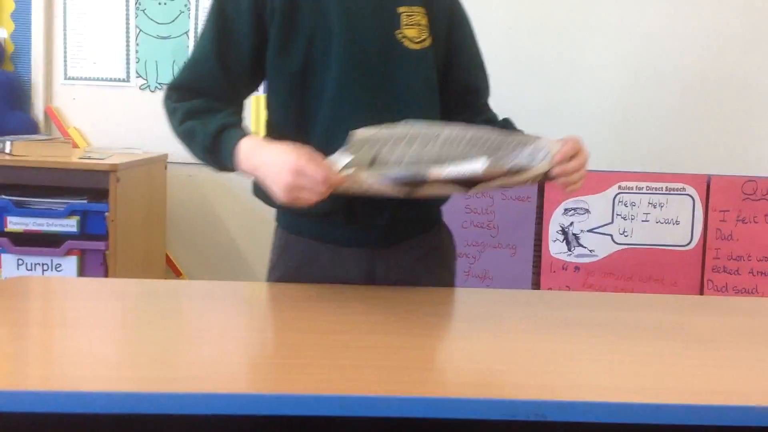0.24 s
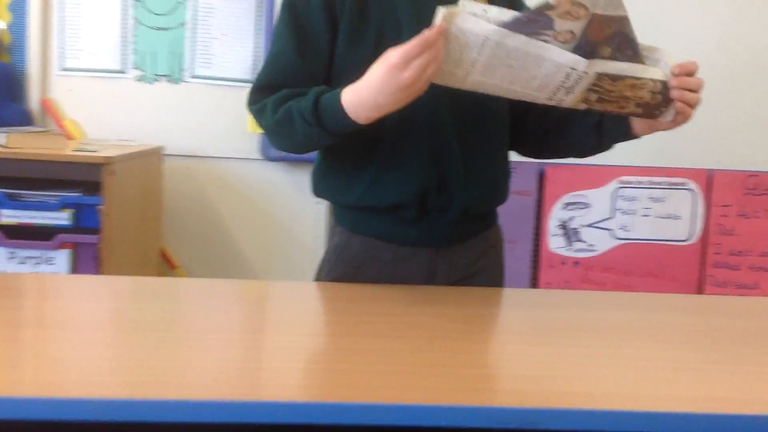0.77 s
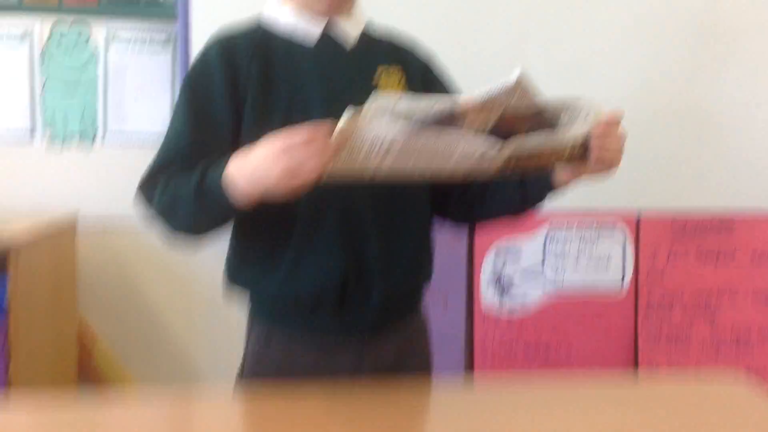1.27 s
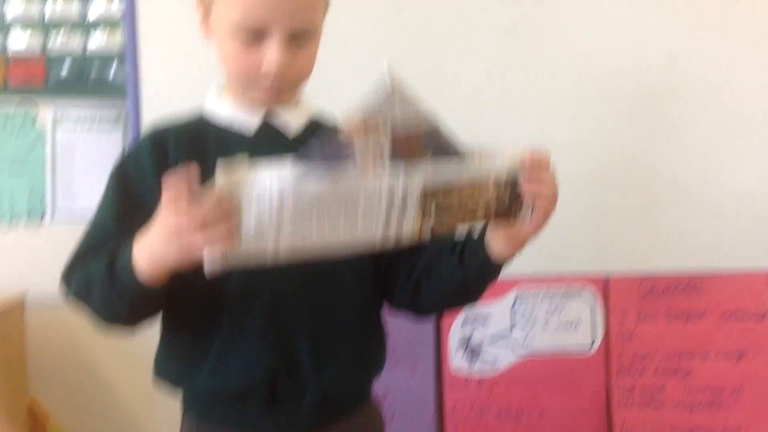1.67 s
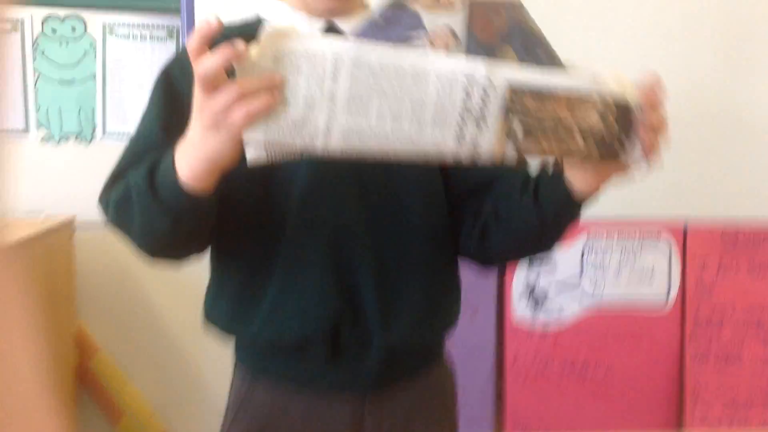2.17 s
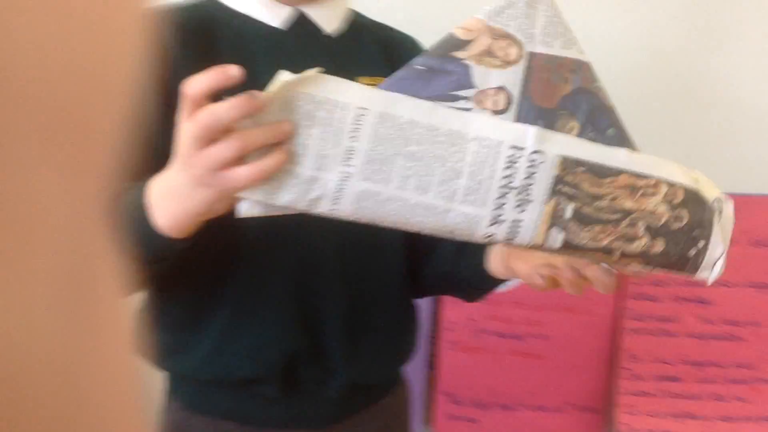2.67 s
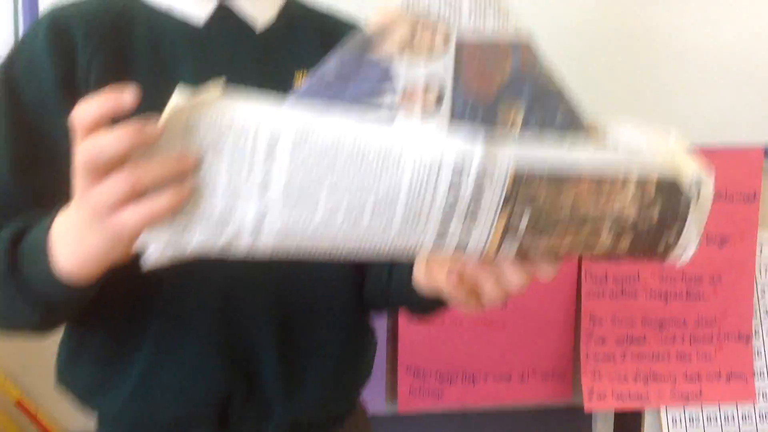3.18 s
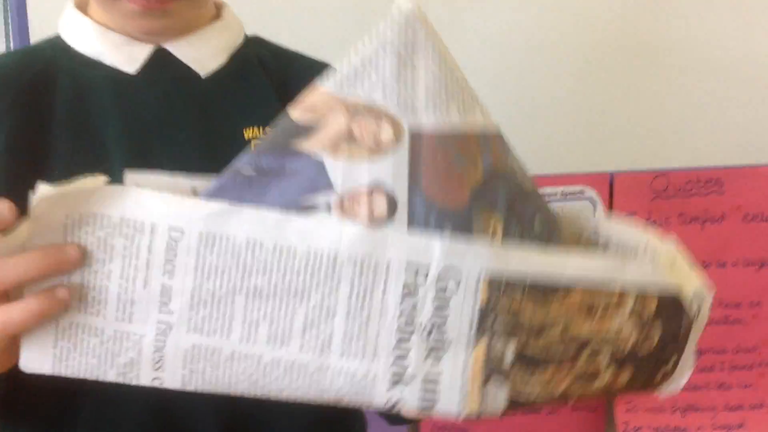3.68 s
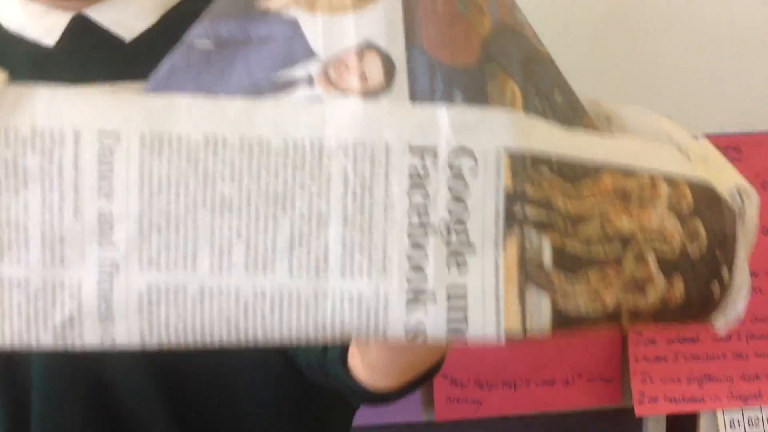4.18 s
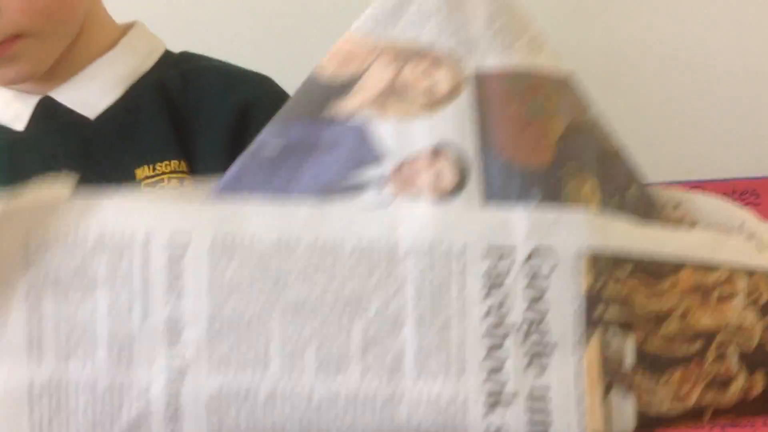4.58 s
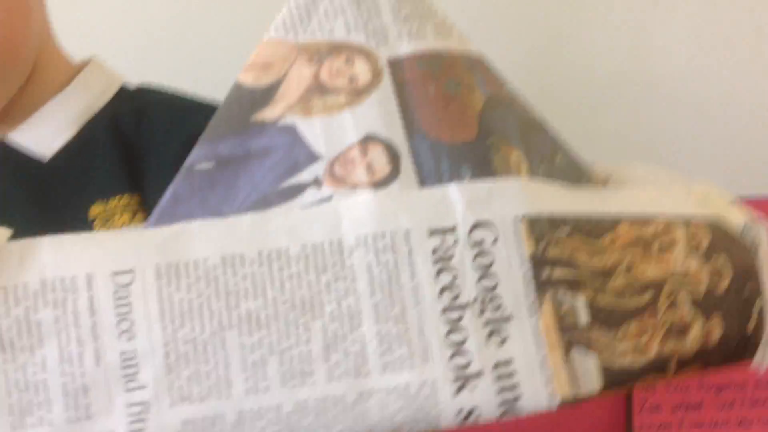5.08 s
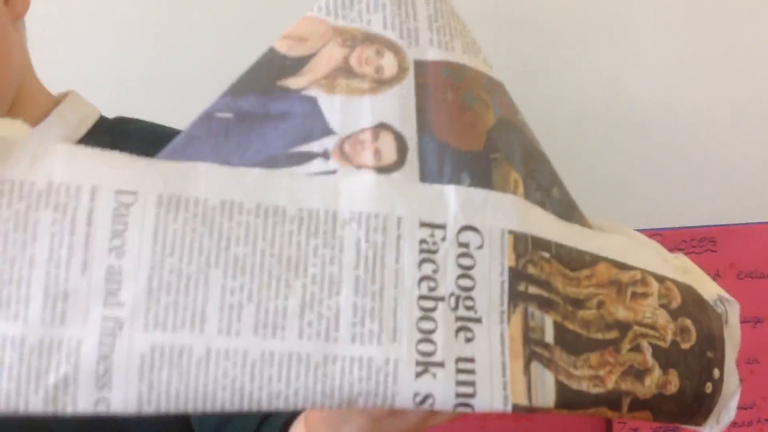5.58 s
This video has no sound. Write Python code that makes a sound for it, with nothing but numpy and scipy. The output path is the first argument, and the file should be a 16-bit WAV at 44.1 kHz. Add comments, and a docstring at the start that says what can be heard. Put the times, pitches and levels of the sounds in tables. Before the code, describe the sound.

A folded newspaper is handled close to a small hand-held microphone in a quiet, hard-walled room, over faint air hiss and a fuzzy low hum. From 0 to 1.5 s there is light, dry rustling: short swishes grainy with tiny crackles, and scattered crisp crease snaps. At about 1.6 s the camera body takes its hardest knock, a sharp tick with a short damped thump, among soft finger bumps. Rustling continues, with a bright snap near 2.5 s, then a lull until about 3.1 s. From 3.2 to 4.1 s comes the loudest flurry, dense hard snaps lasting only milliseconds, stronger swishes, and handling ticks, including a sharp click at 3.6 s. Afterwards the paper sounds duller and sparser, with small snaps near 4.5 s and a gentle swish around 4.8 s. A last cluster snaps at 5.5 s, then it fades to room tone with a barely audible bump near 5.8 s.

```python
"""Folded newspaper, turned and flexed by hand in a quiet, hard-walled room over air and a fuzzy hum.
It opens with light rustle (hiss and tiny crackles) and scattered crease snaps (ringing noise bursts).
The hand-held camera's hardest knock, a tick and a damped thump, lands near 1.6 s among soft bumps.
The loudest snaps come at 2.5 s and from 3.2 to 4.1 s, with more knocks early in that flurry.
The handling then thins out, a last cluster snaps at 5.5 s and a faint bump comes near the end."""
import sys
import numpy as np
from scipy import signal
from scipy.fft import rfft, irfft, next_fast_len
from scipy.io import wavfile
from scipy.ndimage import uniform_filter1d

SR = 44100
rng = np.random.default_rng(int(sys.argv[2]) if len(sys.argv) > 2 else 0)


def master(y):
    """Save y as 16-bit WAV."""
    cut = np.clip(np.atleast_2d(y).T, -1, 1)
    pcm = np.round(cut * 32767)  # scale
    wavfile.write(sys.argv[1], SR, pcm.astype(np.int16))


def decibels_to_gain(level_db):
    """Convert a level in decibels to a linear amplitude gain (20 dB per decade)."""
    exponent = np.asarray(level_db, float) / 20
    return 10 ** exponent


N = 257544

# Creases snapping, levels before room and shading:
# (time [s], peak level [dB], centre frequency [Hz], time to fall by e squared [ms])
CREASE_SNAPS = [(0.1343, -26.5, 6500, 5.1), (0.155, -25, 7550, 6.4), (0.268, -37, 8150, 4.0),
                (0.522, -36, 1440, 2.1), (0.716, -29, 8540, 13), (0.8046, -35.5, 4120, 6.5),
                (0.88, -34.5, 2700, 4.5), (0.9556, -31.5, 2920, 14), (1.0148, -25, 3300, 1.3),
                (1.1735, -29, 3229, 3.1), (1.3245, -26, 2860, 4.5), (1.5711, -25.5, 7700, 2.8),
                (1.6257, -25.5, 2180, 2.2), (1.6828, -25, 7200, 3), (1.849, -29.5, 2770, 5.5),
                (1.9306, -36, 3140, 4.4), (1.9704, -23.5, 5800, 8.3), (2.0116, -27, 3100, 3.1),
                (2.0337, -21, 7100, 4.2), (2.1104, -28.5, 4100, 6.9), (2.2622, -28, 7800, 9),
                (2.461, -14, 5170, 3.1), (2.5067, -23.5, 6600, 2.9), (2.799, -38, 2280, 6.8),
                (3.103, -29, 3050, 5.3), (3.222, -16.5, 5350, 7.1), (3.2693, -22.5, 3260, 11),
                (3.3038, -24, 5830, 2.5), (3.3214, -18, 3500, 3.8), (3.3963, -13.5, 4840, 1.3),
                (3.3994, -18, 4000, 4.9), (3.4345, -11, 4700, 7.9), (3.4455, -27, 3320, 4.3),
                (3.513, -9.5, 6600, 6.3), (3.654, -30.5, 3120, 14), (3.66, -29, 6400, 7),
                (3.6961, -28.5, 2730, 4.8), (3.747, -23, 5630, 4.6), (3.779, -29, 4909, 3.4),
                (3.8822, -21, 2970, 2.3), (3.8862, -9, 5600, 4), (3.9063, -16, 3700, 3.5),
                (3.916, -17.5, 3600, 11.4), (3.9488, -28.5, 2470, 2.7), (4.1109, -12, 3220, 7.1),
                (4.5398, -22, 2820, 4.2), (4.5869, -27.5, 3300, 4.2), (4.989, -38, 1290, 5.6),
                (5.4786, -27, 2930, 4.1), (5.5105, -20, 3130, 3.3), (5.5111, -28, 1330, 3.6),
                (5.5376, -26, 3600, 2.4), (5.6361, -32.5, 3370, 4)]
# Spectrum of the sliding, crackling sheet: (frequency [Hz], relative level [dB])
SHEET_SPECTRUM = [(200, -12.5), (600, -3.5), (1500, -4.5), (3000, 0), (5000, -1), (8000, 1), (11000, -4.5),
                  (15000, -5.5)]
# Swishes of sheet on sheet: (time of full level [s], level [dB], rise [s], hold [s])
SWISHES = [(0.0, -43, .011, 0.019), (0.135, -41.5, 0.037, 0.021), (0.264, -41, 0.19, .005),
           (0.393, -48.5, 0.1, .05), (0.616, -48.5, 0.036, 0.084), (0.725, -47.5, .011, 0.11),
           (0.96, -50.5, 0.0097, .05), (1.013, -38.5, 0.0041, 0.0098), (1.177, -42, .17, .011),
           (1.302, -36, 0.0096, 0.028), (1.635, -44, 0.044, 0.085), (1.802, -38, 0.084, 0.0039),
           (1.854, -52, .1, 0.016), (1.973, -46, 0.019, .04), (2.041, -40, 0.16, .005),
           (2.28, -47.5, 0.32, .005), (2.454, -39.5, 0.021, .016), (2.816, -51.5, 0.03, 0.11),
           (3.097, -43, 0.25, 0.061), (3.229, -41, .015, .009), (3.272, -38.5, .03, 0.11),
           (3.435, -30.5, 0.083, 0.0066), (3.513, -39.5, 0.058, 0.034), (3.788, -42.5, 0.34, 0.01),
           (3.88, -38.5, 0.03, 0.052), (4.103, -43, 0.035, 0.0081), (4.302, -52, 0.25, 0.0081),
           (4.412, -54.5, .06, 0.084), (4.834, -43.5, 0.28, 0.013), (5.187, -51, 0.43, 0.02),
           (5.34, -52, 0.13, .03), (5.525, -48.5, 0.042, .011), (5.626, -56, .21, .005)]
RISE_DB, FALL_DB_PER_S = 40, 166  # each swish climbs RISE_DB in its rise; all die away alike
# Steady handling under the swishes: (time [s], level [dB])
HANDLING = [(0, -50), (.6, -57.5), (.9, -55), (1.5, -51.5), (2.2, -49), (2.45, -51), (2.75, -59.5),
            (3.0, -65), (3.2, -48), (3.7, -46.5), (4.0, -50), (4.35, -59), (4.6, -56.5), (5.1, -58),
            (5.4, -76), (5.84, -87)]
# Crackle against hiss when the motion is at -41.5 dB; harder motion crackles more
CRACKLE_SHARE, CRACKLE_GROWTH = 0.69, 0.17
# Tilt of the paper's treble above 5200 Hz: (time [s], slope [dB per octave])
TREBLE_TILT = [(0, -1), (1.0, -1.5), (1.7, -2), (2.3, -3.5), (2.5, -13.5), (2.9, -8), (3.1, -20.5),
               (3.3, -21.5), (3.58, 2.5), (3.9, -22.5), (4.11, -8.5), (4.3, -26), (5.84, -28.5)]
# Decay of the hard-walled room: (frequency [Hz], time to fall 60 dB [s])
ROOM_DECAY = [(300, 0.43), (2000, 0.11), (6000, 0.3), (14000, 0.28)]
# Camera shell creaking in the grip; the thump settles at 0.8 of its nominal pitch:
# (time [s], tick peak level [dB], thump peak level [dB], nominal thump pitch [Hz])
CAMERA_KNOCKS = [(1.0493, -61, -34, 253), (1.495, -27.5, -33.5, 640), (1.6379, -1.5, 0, 563),
                 (1.6398, -14, -30, 1100), (1.651, -4.5, -24.5, 266), (1.6647, -8, -8, 378),
                 (1.8168, -20, -18, 308), (2.3388, -15, -14, 450), (3.1787, -26, -55, 1248),
                 (3.1846, -25, -54, 581), (3.1915, -31, -54, 1442), (3.34, -32, -34.5, 287),
                 (3.3594, -21, -26.5, 816), (3.3738, -40, -33, 441), (3.39, -41, -24, 1820),
                 (3.43, -29, -31, 352), (3.4409, -32, -30.5, 248), (3.5802, -19, -24, 240),
                 (3.6093, 6, -14.5, 167)]
# Soft bumps of fingers on the camera: (time [s], peak level [dB], pitch [Hz])
FINGER_BUMPS = [(1.607, -31, 514), (1.631, -22, 636), (1.659, -32, 440), (1.795, -36, 250),
                (1.811, -18, 246), (2.592, -43.5, 440), (2.924, -41.5, 402), (2.954, -42.5, 516),
                (3.2122, -25.5, 294), (3.218, -29, 148), (3.599, -26.5, 310), (5.775, -55.5, 165)]
BUMP_CYCLES, BUMP_RATTLE = 0.67, 0.52  # cycles until the swell peaks, rattle against tone
# Spectrum of room tone and microphone hiss: (frequency [Hz], relative level [dB per Hz])
AIR_SPECTRUM = [(30, -43), (90, -18.5), (180, -1), (300, -2.5), (700, -8), (1500, -12.5), (5000, -17),
                (9000, -21), (15000, -23.5), (16000, -75)]
AIR_DB = -61.5  # rms
HUM_HZ, HUM_WIDTH_HZ, HUM_DB = 210, 12, -70  # rms level


def evened(x):
    """Scales to rms 1."""
    return x / np.sqrt(np.mean(x ** 2) + 1e-20)


def peaked(x):
    """Scales to peak 1."""
    return x / abs(x).max()


def read(points, hz):
    """Reads a table on a log-frequency axis."""
    f, value = np.transpose(points)
    return np.interp(np.log(hz + 1), np.log(f + 1), value)


def colour(x, points):
    """Shapes the spectrum of x."""
    size = next_fast_len(len(x))
    gain = decibels_to_gain(read(points, np.fft.rfftfreq(size, 1 / SR)))
    return irfft(rfft(x, size) * gain, size)[:len(x)]


def resonate(x, hz, q):
    """Rings x through one resonance."""
    return signal.lfilter(*signal.iirpeak(hz, q, SR), x)


def add(mix, s, sound):
    """Mixes a sound in at s seconds."""
    part = mix[round(s * SR):][:len(sound)]
    part += sound[:len(part)]


def snaps():
    """A crease flips: a burst of micro-slips rings a patch of the sheet and dies in milliseconds."""
    out, t = np.zeros(N), np.arange(1024) / SR
    noise = rng.standard_normal((len(CREASE_SNAPS), 1024))
    for (s, db, hz, ms), slips in zip(CREASE_SNAPS, noise):
        decay = np.exp(-t / (ms / 1000 / 2))
        band = signal.butter(2, [hz / 3.5, min(2.2 * hz, 14000)], "band", fs=SR)
        wide = evened(signal.lfilter(*band, slips))
        ring = evened(resonate(slips, hz, 3.5))
        add(out, s, decibels_to_gain(db) * peaked((.5 * wide + ring) * decay))
    return out


def rustle():
    """Tiny crackles, each from a patch of its own pitch, over the hiss of sheet sliding on sheet."""
    wobble_db = evened(uniform_filter1d(rng.standard_normal(N), 300))
    hiss = decibels_to_gain(wobble_db) * rng.standard_normal(N)
    crackles = 0
    for hz in np.geomspace(900, 11000, num=7):
        strikes = rng.random(N) < 120 / SR  # about 120 a second at each pitch
        sizes = decibels_to_gain(3.35 * np.minimum(rng.exponential(1, N), 4)) * strikes
        fading = signal.lfilter([1], [1, -.984], sizes)  # each crackle dies in a few milliseconds
        crackles = crackles + resonate(fading * rng.standard_normal(N), hz, 3)
    level = motion()
    share = CRACKLE_SHARE * (level / decibels_to_gain(-41.5)) ** CRACKLE_GROWTH
    return level * evened(colour(hiss + share * evened(crackles), SHEET_SPECTRUM))


def motion():
    """How hard the sheets move: swishes rise, hold and fade, added in power to the steady handling."""
    t = np.arange(0, N, 32) / SR
    power = decibels_to_gain(np.interp(t, *np.transpose(HANDLING))) ** 2
    for s, db, rise, hold in SWISHES:
        climb_db = RISE_DB * np.maximum(s - t, 0) / rise
        fall_db = FALL_DB_PER_S * np.maximum(t - s - hold, 0)
        power = power + decibels_to_gain(db - climb_db - fall_db) ** 2
    return np.interp(np.arange(N) / SR, t, np.sqrt(power))


def shaded(x):
    """Hands and thick folds between creases and microphone tilt the treble as they move."""
    hz, t, z = signal.stft(x, SR, nperseg=128, noverlap=96)
    octaves = np.log2(np.maximum(hz / 5200, 1))[:, None]
    z = z * decibels_to_gain(octaves * np.interp(t, *np.transpose(TREBLE_TILT)))
    return signal.istft(z, SR, nperseg=128, noverlap=96)[1][:N]


def room(x):
    """Hard walls answer with sparse taps of random sign, each band dying at its own speed."""
    taps = np.zeros(SR // 2)
    at = np.arange(200, SR // 2 - 20, 20)
    taps[at + rng.integers(0, 20, at.shape)] = rng.choice([-1., 1.], at.shape)
    hz, t, z = signal.stft(taps, SR, nperseg=256)
    decay = decibels_to_gain(-60 * t / read(ROOM_DECAY, hz)[:, None])
    tail = signal.istft(z * decay, SR, nperseg=256)[1]
    return signal.fftconvolve(x, tail / np.linalg.norm(tail))[:N]


def knocks():
    """A dry tick, a heavily damped thump whose pitch sags, and a low shudder of the grip."""
    out, t = np.zeros(N), np.arange(2048) / SR
    jerk = (t - .0002) / .000025
    shudder_band = signal.butter(1, [130, 900], "band", fs=SR)
    noise = rng.standard_normal((len(CAMERA_KNOCKS), 2048))
    for (s, tick_db, thump_db, hz), slips in zip(CAMERA_KNOCKS, noise):
        chatter = slips * (.25 * np.exp(-(jerk / 5) ** 2) + .04 * np.exp(-t / .002))
        tick = peaked(np.e * jerk * np.exp(-abs(jerk)) + chatter)  # the shell yields, then springs back
        turns = hz * 0.8 * t + 0.49 * (1 - np.exp(-t / 0.0006))  # pitch starts high and sags
        swell = np.exp(-t * hz / 0.46) * (1 - np.exp(-t / 0.00005))
        thump = peaked(np.sin(2 * np.pi * turns) * swell)
        shudder = peaked(signal.lfilter(*shudder_band, slips * np.exp(-t / 0.0069)))
        add(out, s, decibels_to_gain(tick_db) * tick + decibels_to_gain(thump_db) * (thump + 0.19 * shudder))
    return out


def bumps():
    """A low push on the camera swells and dies within a few cycles, with a dull rattle."""
    out, t = np.zeros(N), np.arange(2048) / SR
    noise = rng.standard_normal((len(FINGER_BUMPS), 2048))
    for (s, db, hz), slips in zip(FINGER_BUMPS, noise):
        u = t * hz / BUMP_CYCLES
        tone = np.sin(2 * np.pi * hz * t)
        rattle = evened(signal.lfilter(*signal.butter(1, 3 * hz, fs=SR), slips))
        add(out, s, decibels_to_gain(db) * peaked(u * np.exp(-u) * (tone + BUMP_RATTLE * rattle)))
    return out


def air():
    """Coloured noise for room tone and microphone hiss; resonant noise for a fuzzy ventilation hum."""
    hum = evened(resonate(rng.standard_normal(N), HUM_HZ, HUM_HZ / HUM_WIDTH_HZ))
    hiss = evened(colour(rng.standard_normal(N), AIR_SPECTRUM))
    return decibels_to_gain(AIR_DB) * hiss + decibels_to_gain(HUM_DB) * hum


def scene():
    """Snaps ring in the room, rustle and camera noises stay dry; only the paper is shaded."""
    creases = snaps()
    paper = creases + decibels_to_gain(-11) * room(creases) + rustle()
    return (shaded(paper) + knocks() + bumps() + air())[None]


def top_cut(x):
    """Nothing passes above the cut-off."""
    return signal.sosfilt(signal.butter(12, 16520, fs=SR, output="sos"), x)


def record(dry):
    """A small microphone cuts the bass, saturates and loses the top of the treble."""
    mic = signal.lfilter(*signal.butter(2, 110, "high", fs=SR), dry)
    mic = .75 * np.tanh(mic / .75)
    mic = signal.oaconvolve(mic, signal.firwin(301, 15400, fs=SR)[None], "same")
    return top_cut(mic)


dry = scene()
out = record(dry)
master(out)
```